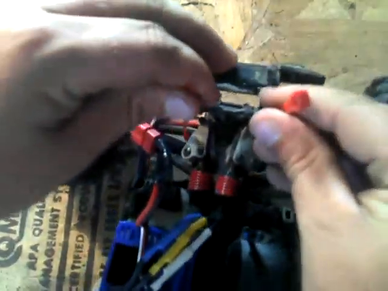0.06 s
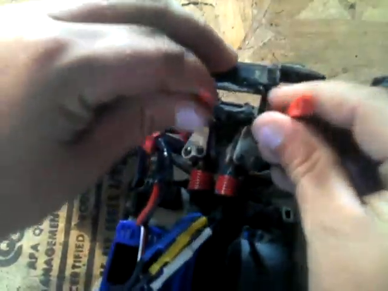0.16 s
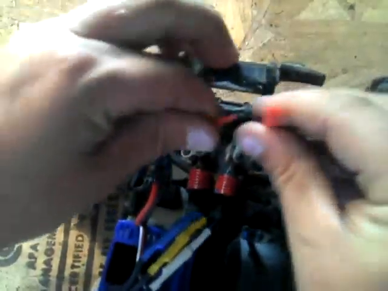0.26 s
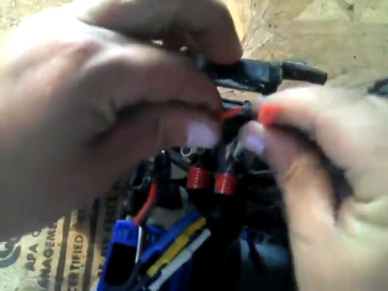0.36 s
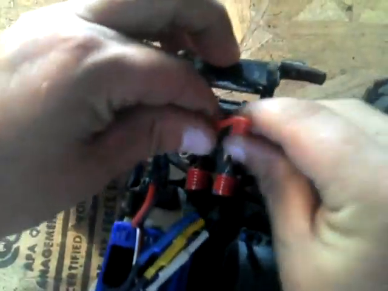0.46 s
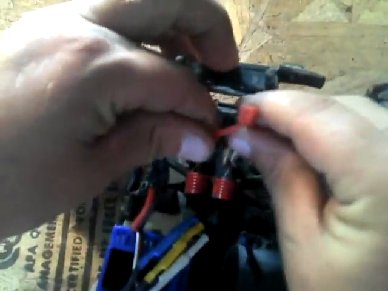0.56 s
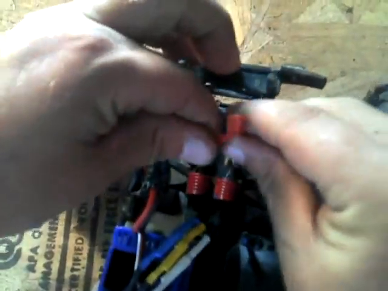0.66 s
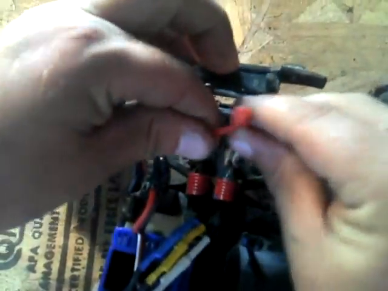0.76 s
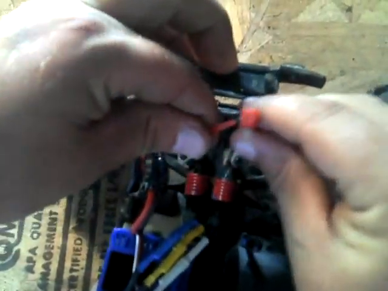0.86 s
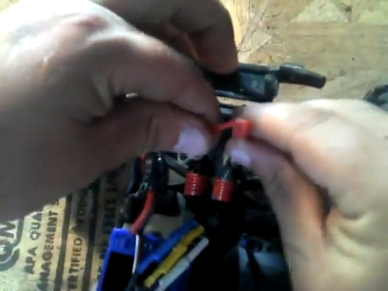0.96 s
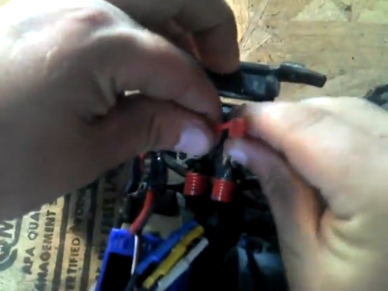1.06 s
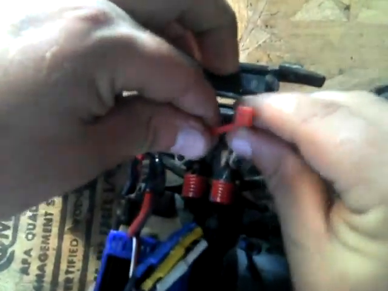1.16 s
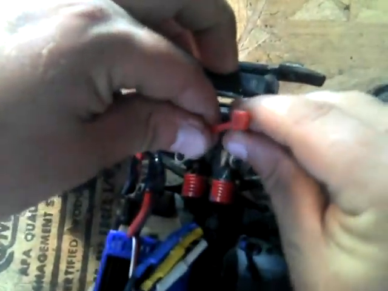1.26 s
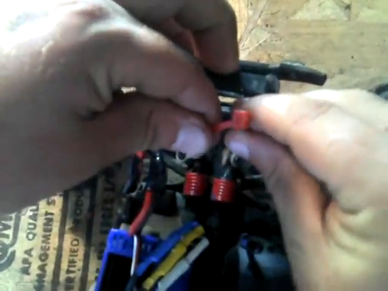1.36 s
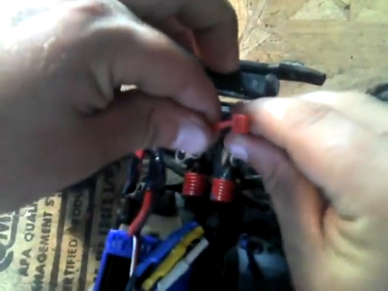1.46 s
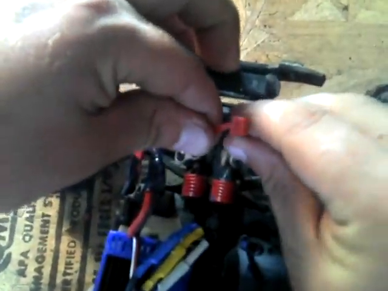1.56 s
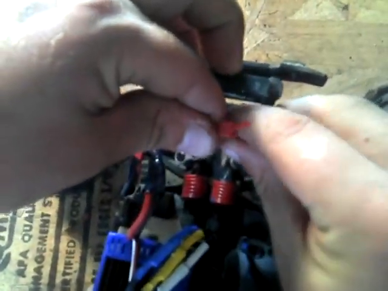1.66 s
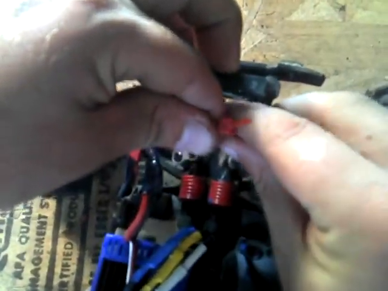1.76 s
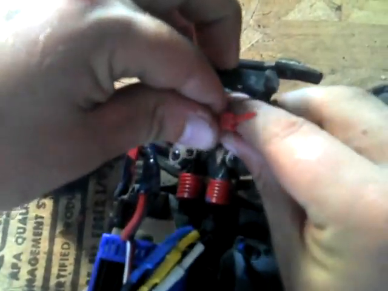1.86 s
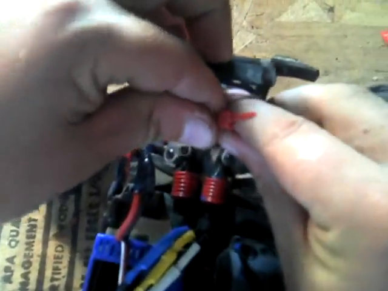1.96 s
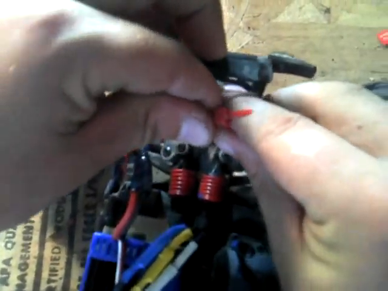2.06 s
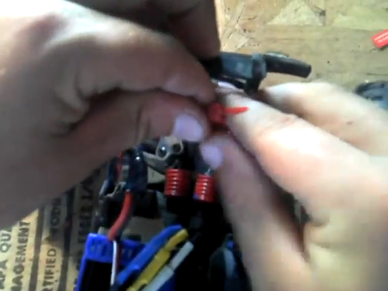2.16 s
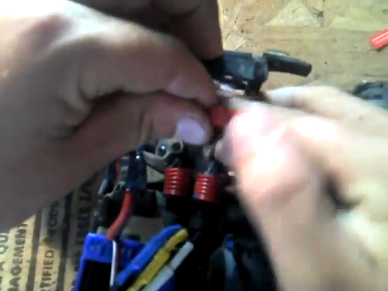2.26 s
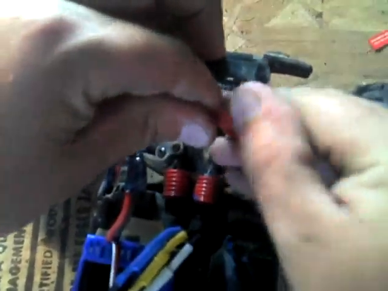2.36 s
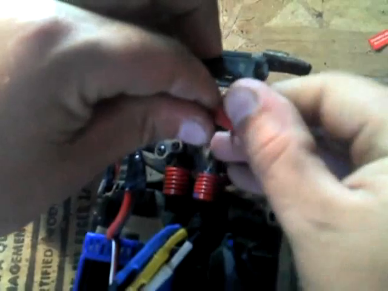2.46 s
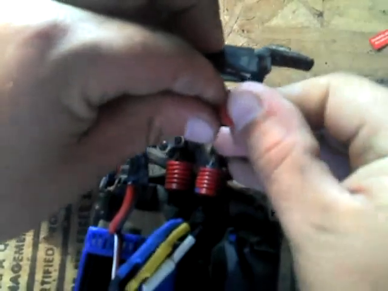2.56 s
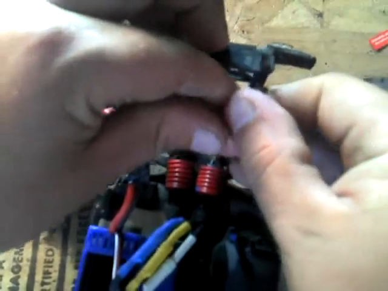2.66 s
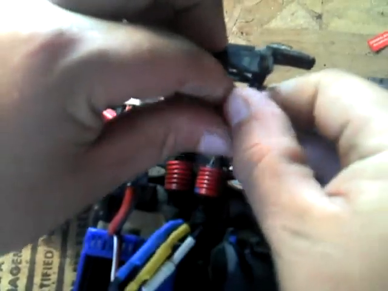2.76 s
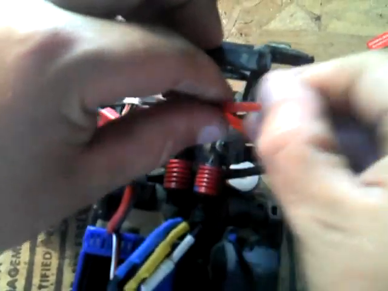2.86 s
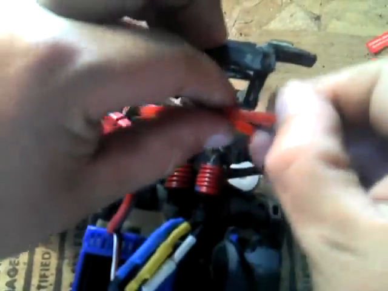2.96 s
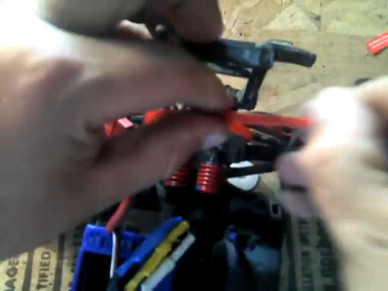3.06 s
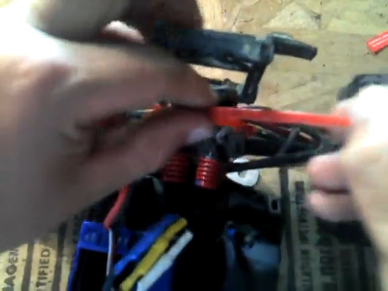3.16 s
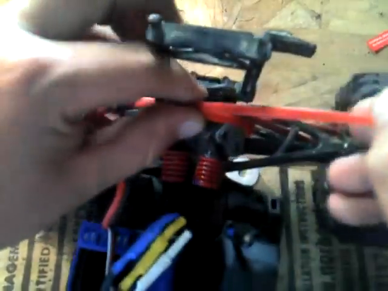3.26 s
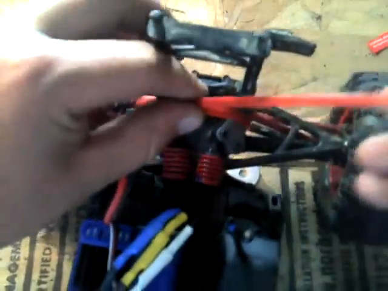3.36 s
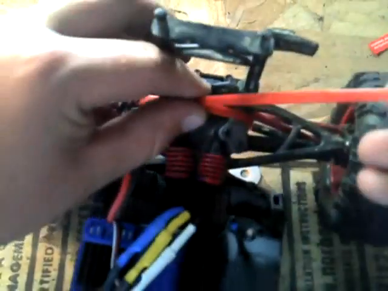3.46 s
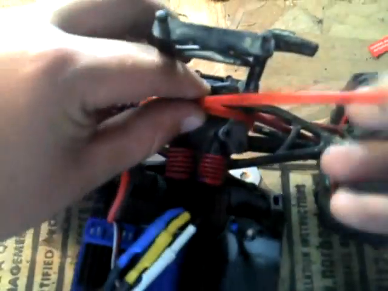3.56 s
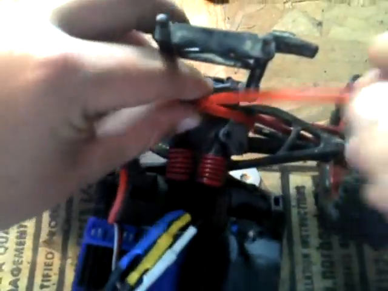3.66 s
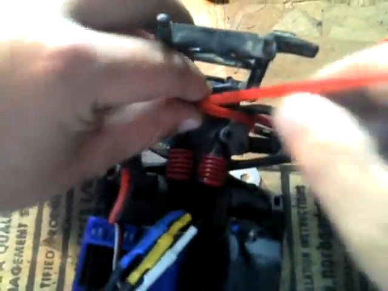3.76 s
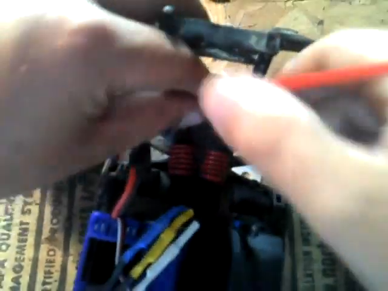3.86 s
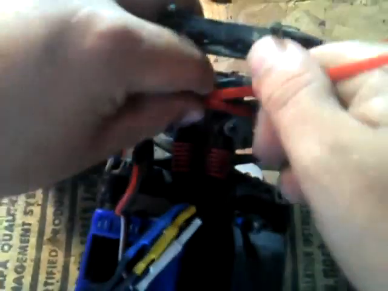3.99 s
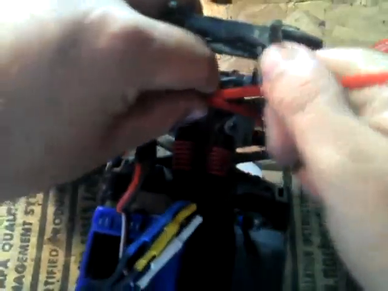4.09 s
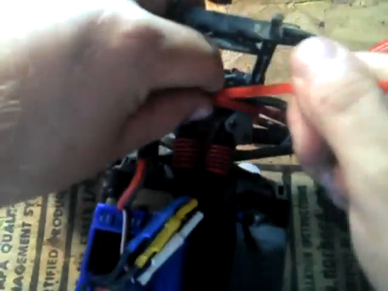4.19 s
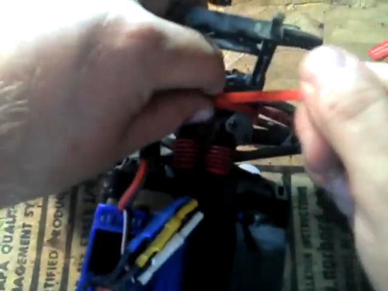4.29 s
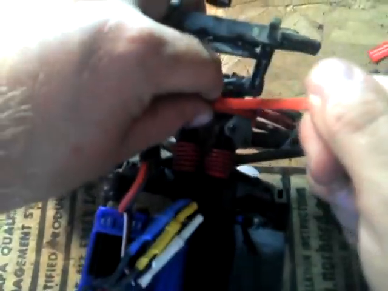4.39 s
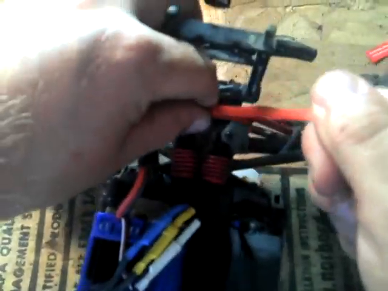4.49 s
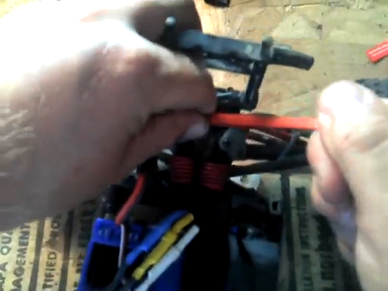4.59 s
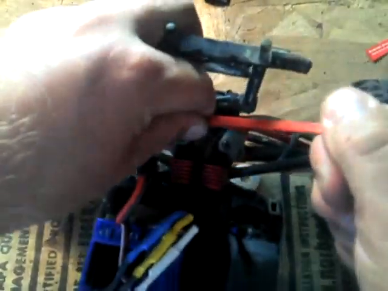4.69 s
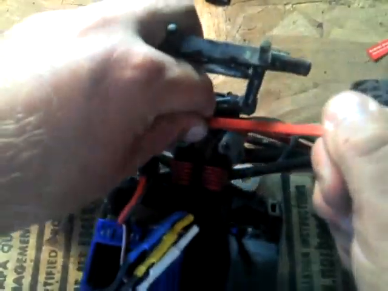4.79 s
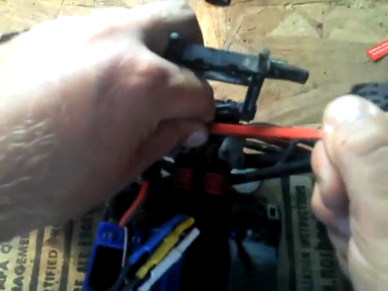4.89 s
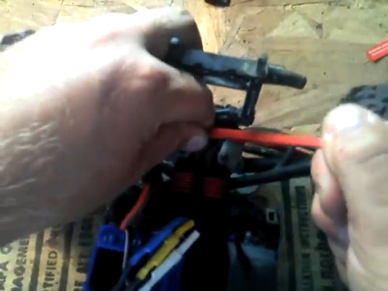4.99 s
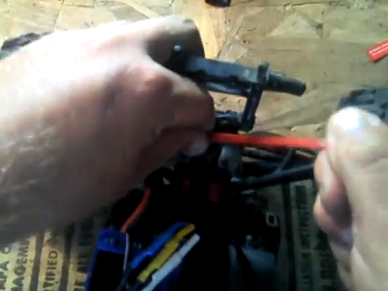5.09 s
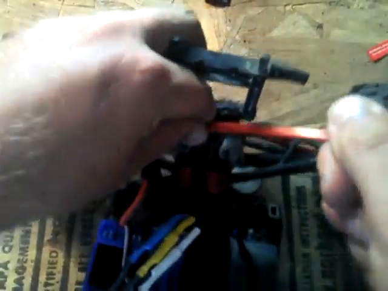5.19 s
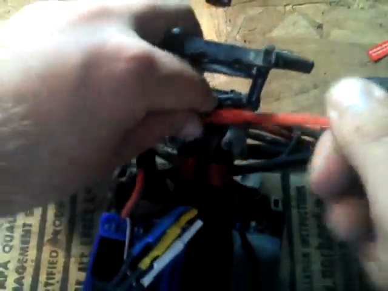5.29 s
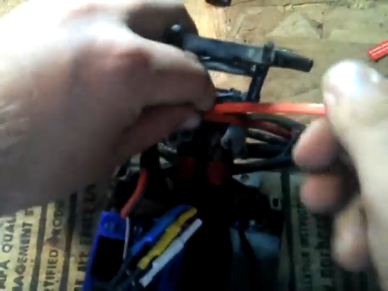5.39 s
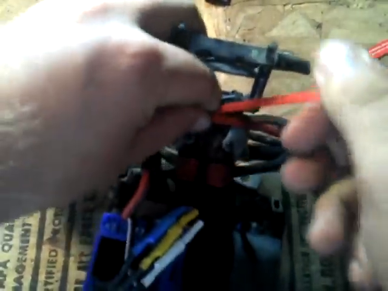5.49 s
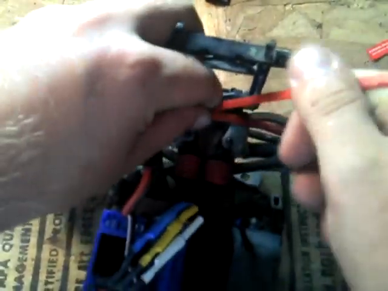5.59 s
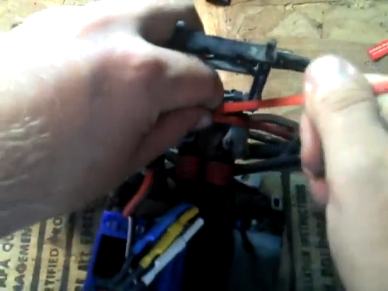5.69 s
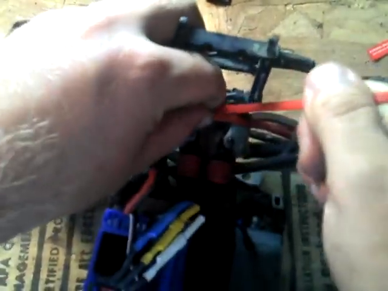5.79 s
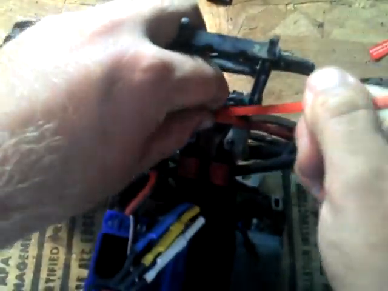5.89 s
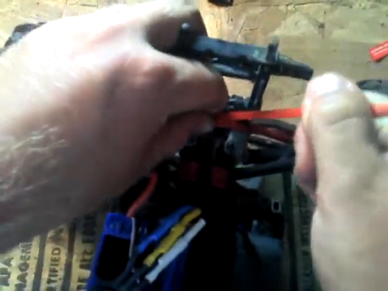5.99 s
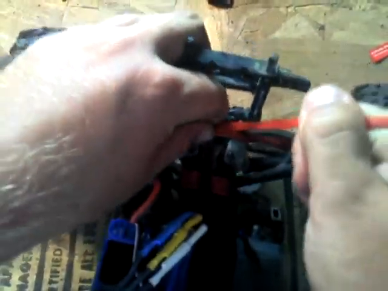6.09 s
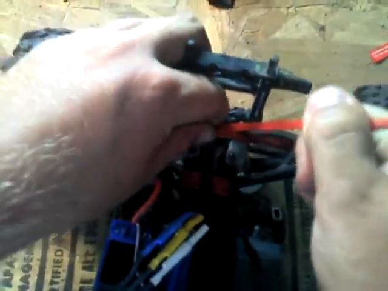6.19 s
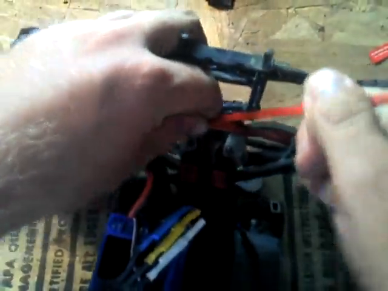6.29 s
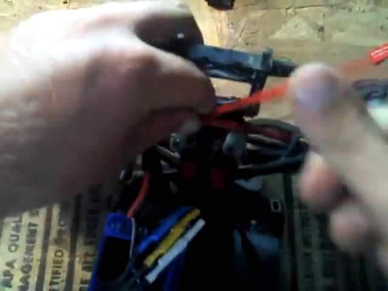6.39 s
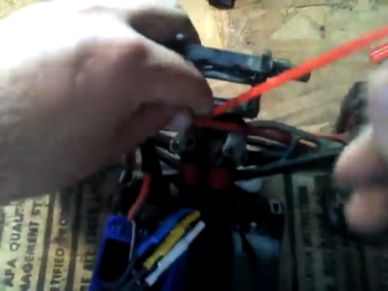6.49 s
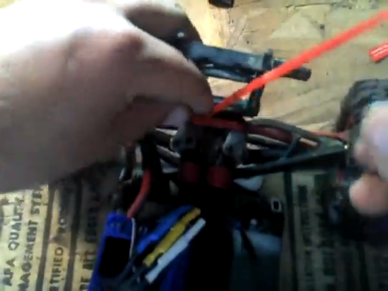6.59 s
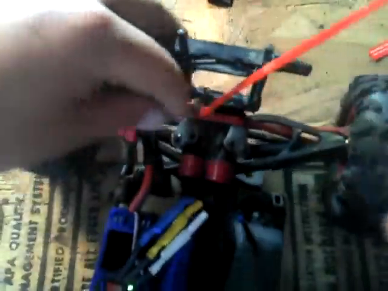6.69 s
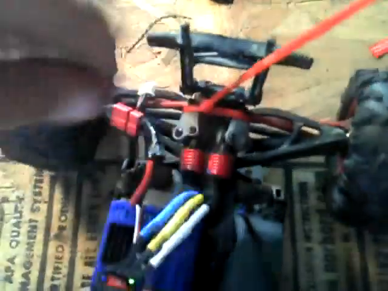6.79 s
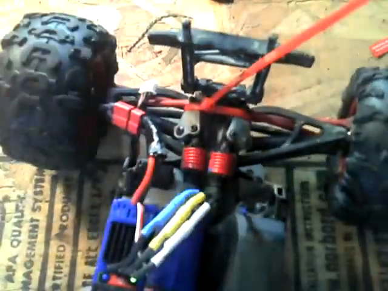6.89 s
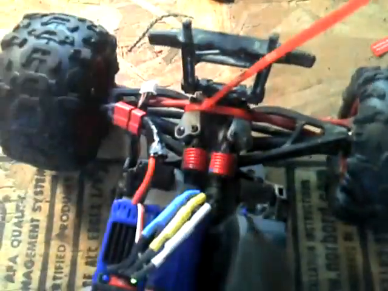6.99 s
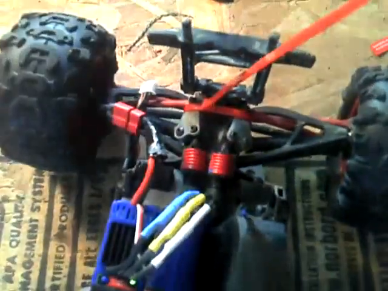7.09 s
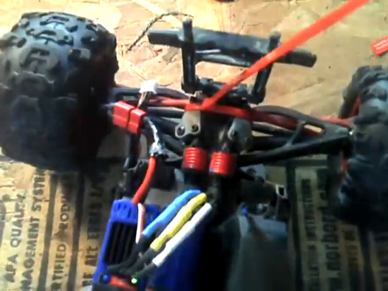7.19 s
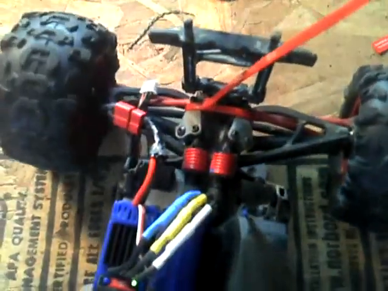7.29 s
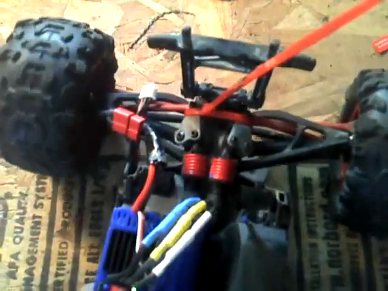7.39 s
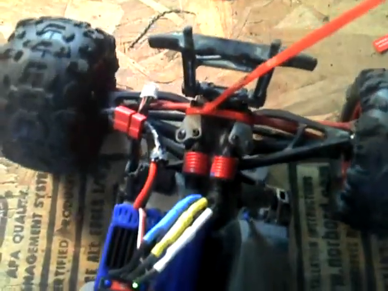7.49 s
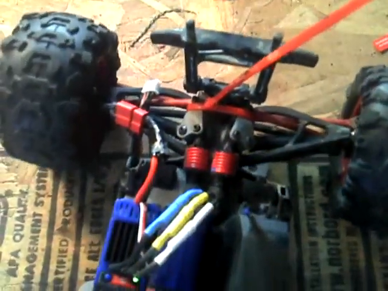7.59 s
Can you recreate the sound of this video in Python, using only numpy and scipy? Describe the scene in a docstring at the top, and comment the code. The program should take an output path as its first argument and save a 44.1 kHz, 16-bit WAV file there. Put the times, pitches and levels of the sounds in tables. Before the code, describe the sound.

A quiet small room with steady soft hiss and a faint unsteady low hum around 120 Hz. From 0 to 3.1 s, only tiny fingernail ticks, faint creaks of wires and brief rubs on plastic, very quiet. At about 3.2 s four light ratchet teeth click, then a nylon strap zips rapidly from 3.3 to 3.6 s, growing louder, and again from 3.6 to 3.75 s, brighter and loudest at the end. Light handling fills the gap. At 4.5 s a short hard tug crackles with a low thump, followed by separate dry snaps until 5.4 s, gradually slower and softer, with a slight hollow plastic ring. Finger ticks and rubs follow, one sharper near 5.64 s. Four weaker teeth click between 6.37 and 6.47 s, then sparse faint handling fades into room noise by 7.5 s. Close microphone, little reverberation, muffled extreme treble.

```python
"""Fingers tick and rub on plastic over a faint hum and hiss: filtered noise bursts and wavering sines.
A nylon zip tie then closes on a toy truck's wires in a quiet room: a few single teeth, three quick pulls,
then tooth by tooth, and after a pause four last teeth and a few more finger ticks. Each tooth is a short
impulse shaped by the strap's standing waves, followed by the decaying modes of the chassis.
Near echoes, scatter and a weak room tail surround the contacts; a steep low-pass ends the treble."""
import sys
import numpy as np
from scipy import signal
from scipy.fft import rfft, irfft
from scipy.io import wavfile

SR = 44100
rng = np.random.default_rng(int(sys.argv[2]) if len(sys.argv) > 2 else 0)


def store_pcm(level_fs):
    """Save levels as 16-bit WAV."""
    pcm = np.round(np.clip(level_fs, -1, 1) * 32767).astype(np.int16)
    wavfile.write(sys.argv[1], SR, np.atleast_2d(pcm).T)


N = 337365  # samples
TOP_HZ = 8100  # upper limit of the microphone


def undb(db):
    """Decibel definition: amplitude ratio of a level."""
    return 10 ** (np.asarray(db) / 20)


def unit(x):
    """Normalisation: scale to rms 1."""
    return x / np.sqrt(np.mean(x ** 2))


def add(out, s, x):
    """Superposition: mix x into out from time s."""
    i = max(0, int(s * SR))
    out[i:i + len(x)] += x[:max(0, len(out) - i)]


def at(curve, when):
    """Linear interpolation: the columns of a curve at the given time."""
    s, *columns = np.transpose(curve)
    return [np.interp(when, s, c) for c in columns]


def bins(size):
    """Fourier analysis: frequencies of a real transform, kept above zero."""
    return np.maximum(np.fft.rfftfreq(size, 1 / SR), 1)


def colour(points, f):
    """Spectral envelope: dB at frequencies f, interpolated over log frequency."""
    hz, db = np.transpose(points)
    return np.interp(np.log(f), np.log(hz), db)


def bell(f, hz, octaves):
    """Resonance curve: a smooth hump of height 1 round hz."""
    return 1 / (1 + (np.log2(f / hz) / octaves) ** 2)


def causal(db):
    """Minimum phase: the shortest causal impulse response with this dB spectrum."""
    cepstrum = irfft(np.log(undb(db)))
    half = len(cepstrum) // 2
    # fold the negative-time half onto the positive
    cepstrum[1:half] *= 2
    cepstrum[half + 1:] = 0
    return irfft(np.exp(rfft(cepstrum)))


def band(x, hz, octaves):
    """Resonance: pass x through a broad, minimum-phase peak."""
    response_db = 20 * np.log10(bell(bins(512), hz, octaves))
    return signal.fftconvolve(x, causal(response_db))[:len(x)]


def fade(t, t60):
    """Exponential decay: the level falls by 60 dB in t60 seconds."""
    return undb(-60 * t / t60)


def drift(per_second):
    """Low-pass noise: slow chance of spread 1, holding only rates below per_second."""
    spectrum = rfft(rng.standard_normal(N))
    return unit(irfft(spectrum * (bins(N) < per_second), N))


def hum(hz, waver=.35, sway=0.0196):
    """Amplitude and frequency modulation: a low tone, unsteady in level and pitch."""
    phase = 2 * np.pi * np.cumsum(hz * (1 + sway * drift(4))) / SR
    return unit(np.sin(phase) * (1 + waver * drift(9.9)))


# spectrum of the room noise, relative: pitch_hz [Hz], level_db [dB]
ROOM_SPECTRUM = [(18, -93), (30, -56), (43, -22.5), (70, -16), (117, -7.5), (148, -4), (195, -6.5),
                 (298, -8), (414, -11), (535, -12.5), (743, -12.5), (2290, -19), (4950, -20), (6880, -26),
                 (8100, -65.5), (10500, -81.5), (17800, -120)]
# swells of the hum: start_s [s], length_s [s], pitch_hz [Hz], level_db [dB rms of the tone before its edges]
HUM_SWELLS = [(0.39, 1.06, 121, -70), (2.312, 0.37, 124, -69.5), (3.596, .7, 130, -72),
              (6.036, 0.37, 112, -67)]
ROOM_DB = -64.5  # rms
HUM_HZ, HUM_DB = 119, -78.5


def background(swell_edge_s=.06):
    """Shaped stationary noise: even room noise and hiss, with a low hum that wavers and swells."""
    t = np.arange(N) / SR
    white = rfft(rng.standard_normal(N))
    hiss = unit(irfft(white * undb(colour(ROOM_SPECTRUM, bins(N))), N))
    out = undb(ROOM_DB) * hiss + undb(HUM_DB) * hum(HUM_HZ)
    for s, length, hz, db in HUM_SWELLS:
        edges = np.clip(np.minimum(t - s, s + length - t) / swell_edge_s, 0, 1)
        out += undb(db) * edges * hum(hz)
    return out


QUIETER_S = 5.9  # stray creaks are weaker from here


def fidget(per_second=18, db=-53, spread_db=5.5, hz=4200, octaves=0.3, t60=0.011, quieter_db=-5):
    """Random shot process: faint stray creaks of wires and strap, weaker in the last part."""
    t = np.arange(SR // 20) / SR
    slips = (rng.random(N) < per_second / SR) * undb(db + spread_db * rng.standard_normal(N))
    slips *= undb(quieter_db * (np.arange(N) / SR > QUIETER_S))
    cracks = signal.fftconvolve(slips, fade(t, t60))[:N] * rng.standard_normal(N)
    return band(cracks, hz, octaves)


# short rubs of fingers, strap and wires:
# start_s [s], length_s [s, cut at 0.25], level_db [dB rms], pitch_hz [Hz, centre], width_octaves [octaves]
RUBBINGS = [(.005, 0.076, -64, 1500, 2.1), (0.515, .3, -72.5, 3900, 1), (1.767, 0.028, -65.5, 585, 0.55),
            (1.94, 0.033, -59, 3770, 0.48), (2.13, 0.022, -66.5, 320, 0.23),
            (2.412, 0.032, -60.5, 4540, 0.3), (2.489, 0.035, -54.5, 3850, 1.6),
            (3.11, 0.12, -56, 4660, 0.67), (5.46, 0.042, -64, 920, 0.94), (5.52, 0.093, -58, 3520, 2.7),
            (5.636, 0.026, -52, 2440, 1.1), (6.559, 0.18, -65, 4480, 0.71),
            (6.625, 0.11, -64.5, 1910, 0.21), (6.78, .09, -75.5, 5160, 0.038),
            (7.257, 0.07, -69.5, 4500, 0.55), (7.348, 0.013, -61.5, 320, 1.2)]
# creaks of the taut strap just before the first tooth of a fresh grip gives way: start_s [s], level_db [dB rms]
STRAP_CREAKS = [(4.492, -44.5), (6.359, -53)]
CREAK_S, CREAK_HZ, CREAK_OCTAVES = .008, 4680, 0.93


def rubs(grain_db=4):
    """Stick-slip friction: skin and nylon slide in short swells of uneven micro-slips."""
    out = np.zeros(N)
    creaks = [(s, CREAK_S, db, CREAK_HZ, CREAK_OCTAVES) for s, db in STRAP_CREAKS]
    for s, length, db, hz, octaves in [*RUBBINGS, *creaks]:
        noise, grain = rng.standard_normal((2, SR // 4))[:, :int(length * SR)]
        # each grain holds its level for 32 samples
        slips = noise * undb(grain_db * np.repeat(grain, 32)[:len(noise)])
        swell = slips * np.hanning(len(noise))
        add(out, s, undb(db) * unit(band(swell, hz, octaves)))
    return out


# modes of the chassis, levels relative: pitch_hz [Hz], level_db [dB], t60_s [s]
CHASSIS_MODES = [(939, 9.5, 0.016), (1078, 15.5, 0.0087), (1260, -2.5, 0.031), (1710, -17.5, 0.036),
                 (2060, -0.5, 0.052), (2490, -19, 0.011), (2888, 7, 0.012), (3896, 5, 0.029)]


def chassis_ring():
    """Modal superposition: answer to one knock, peak 1; neighbouring modes swing in opposite directions."""
    t = np.arange(2048) / SR
    ring = np.zeros(len(t))
    for k, (hz, db, t60) in enumerate(CHASSIS_MODES):
        ring += (-1) ** k * undb(db) * fade(t, t60) * np.sin(2 * np.pi * hz * t)
    # its small parts radiate little bass
    ring = signal.sosfilt(signal.butter(3, 750, "high", fs=SR, output="sos"), ring)
    return ring / np.abs(ring).max()


# fingernails and strap tip on plastic: start_s [s], level_db [dB peak of the crack], pitch_hz [Hz, centre]
TICK_CONTACTS = [(0.0368, -35.5, 4140), (0.1535, -45.5, 3950), (0.2054, -45.5, 4680), (0.612, -47.5, 4240),
                 (0.7013, -39.5, 3800), (0.9921, -45, 4100), (1.0301, -42, 3620), (1.1169, -48.5, 4570),
                 (1.4955, -46, 4810), (1.5364, -38.5, 3760), (1.695, -42, 4970), (2.0682, -48.5, 3880),
                 (2.5032, -40.5, 4240), (2.594, -47.5, 3860), (2.8365, -43.5, 4360), (3.0884, -46.5, 3840),
                 (3.9165, -45, 3650), (4.1699, -41, 4070), (4.2303, -47.5, 4060), (5.5468, -41, 4740),
                 (5.5782, -42, 3940), (5.6406, -28.5, 4180), (5.8264, -47.5, 2600), (6.4304, -42, 5110),
                 (6.5884, -44.5, 4300), (6.6473, -43.5, 2170), (7.0472, -50.5, 2470), (7.3507, -49, 3910)]


def ticks(octaves=0.35, t60=0.012, knock_db=-12):
    """Impact excitation: a tiny crack that soon dies, with a soft knock of the chassis under it."""
    out, t, chassis = np.zeros(N), np.arange(SR // 10) / SR, chassis_ring()
    for s, db, hz in TICK_CONTACTS:
        crack = band(rng.standard_normal(len(t)) * fade(t, t60), hz, octaves)
        add(out, s, undb(db) * crack / np.abs(crack).max())
        add(out, s, undb(db + knock_db) * chassis)
    return out


# the loop closes on the wires after this many teeth; tension then builds over a few more
SNUG_TEETH, TIGHTEN_TEETH = 84, 11


def by_loop(drawn, wide_open, snug, tight):
    """Progressive loading: moves steadily from open to snug as teeth are drawn, then settles to tight."""
    closed = min(drawn / SNUG_TEETH, 1)
    tension = 1 - np.exp(-max(drawn - SNUG_TEETH, 0) / TIGHTEN_TEETH)
    return wide_open + closed * (snug - wide_open) + tension * (tight - snug)


# the loose end flexes like a cantilever, lower as more of it comes through the head
STUB_HZ, STUB_TEETH, FLEX_DB, GRAB_TEETH = 1840, 34, -36.5, 58


def loose_end(t, drawn, t60=0.022):
    """Cantilever law: pitch falls as the inverse square of length, until the fingers grab the end and damp it."""
    hz = STUB_HZ / (1 + drawn / STUB_TEETH) ** 2
    undamped = 1 / (1 + (drawn / GRAB_TEETH) ** 10)
    return undb(FLEX_DB) * undamped * fade(t, t60) * np.sin(2 * np.pi * hz * t)


# moving notch of the strap, climbing as the loop shrinks and sinking under tension:
# start_s [s], pitch_hz [Hz]
STRAP_NOTCH = [(3.23, 3380), (3.36, 4100), (3.46, 4480), (3.51, 5100), (3.56, 5270), (3.73, 5850),
               (4.5, 5150), (4.63, 4370), (5.35, 4310), (6.37, 4600)]
RING_SPACING_HZ, LOWER_NOTCH_HZ = 2150, 2830  # between standing waves; a notch that stays put
OPEN_RIPPLE_DB, RIPPLE_OCTAVES = 5.5, .4
# the standing waves weaken as the loop closes, then return slightly under tension
SNUG_RIPPLE_DB, TIGHT_RIPPLE_DB = 1, 2
BUILD_TEETH = 9


def strap(f, when, drawn, lift_db=5.5, best_hz=5650, best_octaves=0.47,
          notch_db=7, lower_db=8, notch_octaves=0.023):
    """Standing waves: evenly spaced dB ripples slide with the notch, strongest where the strap radiates best."""
    notch_hz, = at(STRAP_NOTCH, when)
    # the standing waves need a few teeth of strap through the head before they build up
    built = 1 - np.exp(-drawn / BUILD_TEETH)
    ripple_db = built * by_loop(drawn, OPEN_RIPPLE_DB, SNUG_RIPPLE_DB, TIGHT_RIPPLE_DB)
    waves = -np.cos(2 * np.pi * (f - notch_hz) / RING_SPACING_HZ)
    ripple = ripple_db * waves * bell(f, best_hz, RIPPLE_OCTAVES)
    lift = built * lift_db * bell(f, best_hz, best_octaves)
    notches = notch_db * bell(f, notch_hz, notch_octaves)
    notches += lower_db * bell(f, LOWER_NOTCH_HZ, notch_octaves)
    return ripple + lift - notches


def wander(times, memory_s=.012, count=24):
    """Autoregressive chance of spread 1: alike when times are close, unrelated when far apart."""
    values = rng.standard_normal((len(times), count))
    for k, kept in enumerate(np.exp(-np.diff(times) / memory_s)):
        values[k + 1] = kept * values[k] + np.sqrt(1 - kept ** 2) * values[k + 1]
    return values


# quick pulls, one list each: start_s [s], rate [teeth per second], level_db [dB of the snap]
QUICK_PULLS = [
    [(3.3235, 78, -14), (3.35, 195, -15), (3.385, 237, -16), (3.42, 210, -15.5), (3.465, 216, -15),
     (3.505, 301, -13), (3.545, 241, -12), (3.58, 57, -11)],
    [(3.6166, 50, -10.5), (3.635, 53, -11), (3.66, 176, -11), (3.69, 288, -10), (3.715, 198, -8.5),
     (3.74, 54, -7.5)],
    [(4.4975, 222, -7.5), (4.518, 197, -7.5), (4.5475, 54, -8.5)],
]
# single teeth: start_s [s, onset], level_db [dB of the snap before SINGLE_DB]
SINGLE_TEETH = [(3.1734, -26), (3.2022, -24), (3.2155, -16.5), (3.2341, -14.5), (4.5815, -10),
                (4.6279, -11.5), (4.6469, -11), (4.6634, -12), (4.6823, -12), (4.707, -11.5),
                (4.7438, -11.5), (4.775, -11), (4.8003, -11), (4.8307, -12.5), (4.8658, -13.5),
                (4.8907, -12.5), (4.9149, -13.5), (4.9516, -13.5), (4.9846, -15.5), (5.0312, -15),
                (5.1087, -15.5), (5.1484, -16), (5.1813, -16.5), (5.2305, -17.5), (5.305, -15.5),
                (5.3505, -16), (5.4052, -16), (6.3676, -13.5), (6.3906, -15), (6.4173, -16.5),
                (6.4635, -16.5)]
SNAP_LAG_S, SINGLE_DB = 0.00084, -0.4  # constant delay from listed onset to snap, and level trim


def teeth():
    """Ratchet kinematics: (s, dB) of one snap per tooth pitch of strap drawn through the head, in order."""
    rows = [(s + SNAP_LAG_S, db + SINGLE_DB) for s, db in SINGLE_TEETH]
    for pull in QUICK_PULLS:
        t = np.arange(pull[0][0], pull[-1][0], 1 / SR)
        travel = np.cumsum(at(pull, t)[0]) / SR  # in teeth
        times = np.interp(np.arange(round(travel[-1]) + 1), travel, t)
        # the strap sticks and slips, so each tooth comes a little early or late
        times += .00013 * rng.standard_normal(len(times))
        rows += zip(times, at(pull, times)[1])
    return sorted(rows)


# basic spectrum of a snap, relative: pitch_hz [Hz], level_db [dB]
SNAP_SPECTRUM = [(59, -37), (100, -23), (270, -23.5), (324, -19), (420, -17), (860, -17.5), (996, -15.5),
                 (1360, -16), (1930, -9), (2450, -5), (2790, -7.5), (3410, -0.5), (4840, 2), (6860, -4),
                 (8100, -40.5), (10500, -83), (17800, -120)]
# the tighter the loop, the more of each snap reaches the chassis
OPEN_CHASSIS_DB, SNUG_CHASSIS_DB, TIGHT_CHASSIS_DB = -41.5, -25.5, -23
OPEN_BODY_DB, SNUG_BODY_DB, TIGHT_BODY_DB = 1.5, -12, -1
# one hard tug jolts the whole truck: TUG_DB is added to the usual THUD_DB of the bass
TUG_S, TUG_LENGTH_S, TUG_DB, THUD_DB = 4.535, 0.03, 13.5, -5.5


def ratchet(body_hz=1600, body_octaves=0.49, thud_hz=850, bend_s=.0024,
            chassis_lag_s=0.00155, hand_s=0.001278, vary_db=2.1):
    """Impulse excitation: the pawl drops off each tooth, the strap colours the snap, the chassis answers."""
    out, f, chassis = np.zeros(N), bins(2048), chassis_ring()
    t = np.arange(len(chassis)) / SR
    # bending waves are slower at low pitch, so the snap sweeps downward
    lag = bend_s * np.clip(np.sqrt(2000 / f) - .65, 0, 2)
    dispersion = np.exp(-2j * np.pi * np.cumsum(lag) * (f[2] - f[1]))
    fade_out = np.cos(np.pi / 2 * t / t[-1]) ** 2
    snaps = teeth()
    chances = wander([s for s, _ in snaps])
    for drawn, ((when, db), (reach, *chance)) in enumerate(zip(snaps, chances)):
        body_db = by_loop(drawn, OPEN_BODY_DB, SNUG_BODY_DB, TIGHT_BODY_DB)
        chassis_db = by_loop(drawn, OPEN_CHASSIS_DB, SNUG_CHASSIS_DB, TIGHT_CHASSIS_DB)
        thud_db = THUD_DB + TUG_DB * np.exp(-((when - TUG_S) / TUG_LENGTH_S) ** 2)
        shape = colour(SNAP_SPECTRUM, f) + strap(f, when, drawn)
        # the hollow plastic sets the middle
        shape += body_db * bell(f, body_hz, body_octaves)
        # the hard tug lifts the bass
        shape += thud_db / (1 + (f / thud_hz) ** 4)
        # no two teeth are quite alike
        shape += vary_db * np.interp(f, np.linspace(0, TOP_HZ, len(chance)), chance)
        # the moving hand throws each snap back a little sooner or later
        hand_delay_s = hand_s * (1 + .12 * reach)
        hand = 1 + undb(-13) * np.exp(-2j * np.pi * f * hand_delay_s)
        snap = irfft(rfft(causal(shape)) * dispersion * hand) * fade_out
        add(out, when, undb(db) * snap / np.abs(snap).max())
        add(out, when + chassis_lag_s, undb(db + chassis_db) * chassis)
        add(out, when, undb(db) * loose_end(t, drawn))
    return signal.sosfilt(signal.butter(2, 130, "high", fs=SR, output="sos"), out)


# echoes off the truck and the bench: delay_s [s], level_db [dB against direct], sign [+1 or -1]
NEAR_ECHOES = [(.00068, -44.5, -1), (.0017, -18, 1), (.0046, -28, 1)]


def space(x, scatter_db=-13.5, scatter_t60=0.048, walls_db=-24, walls_s=0.017,
          room_db=-22, room_t60=0.35, room_hz=4800, room_octaves=4.7):
    """Convolution: direct sound, near echoes, scatter among the truck's parts, soft walls and a weak tail."""
    t = np.arange(SR // 2) / SR
    scatter = unit(rng.standard_normal(len(t)) * fade(t, scatter_t60) * (t > .001))
    walls = unit(rng.standard_normal(len(t)) * np.exp(-(3 * (t / walls_s - 1)) ** 2))
    tail = band(rng.standard_normal(len(t)), room_hz, room_octaves)
    tail = unit(tail * fade(t, room_t60) * (t > .008))
    response = undb(scatter_db) * scatter + undb(walls_db) * walls + undb(room_db) * tail
    response /= np.sqrt(len(t))  # the levels are total energies against the direct sound
    response[0] += 1
    for s, db, sign in NEAR_ECHOES:
        add(response, s, np.array([sign * undb(db)]))
    return signal.fftconvolve(x, response)[:N]


def scene():
    """Superposition: the tie and the fingers in their space, heard from just above the bench, over the room."""
    # a low-pass takes the highest treble off the finger sounds
    treble_cut = signal.butter(16, 6800, fs=SR, output="sos")
    fingers = signal.sosfilt(treble_cut, ticks() + rubs() + fidget())
    return (space(ratchet() + fingers) + background())[None]


def record(dry):
    """Band limitation: a narrow-band microphone cuts the top with a steep elliptic low-pass."""
    return signal.sosfilt(signal.ellip(10, .2, 70, TOP_HZ, fs=SR, output="sos"), dry)


dry = scene()
out = record(dry)
store_pcm(out)
```